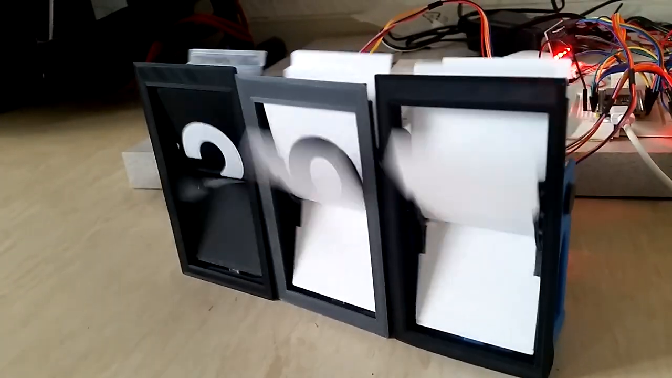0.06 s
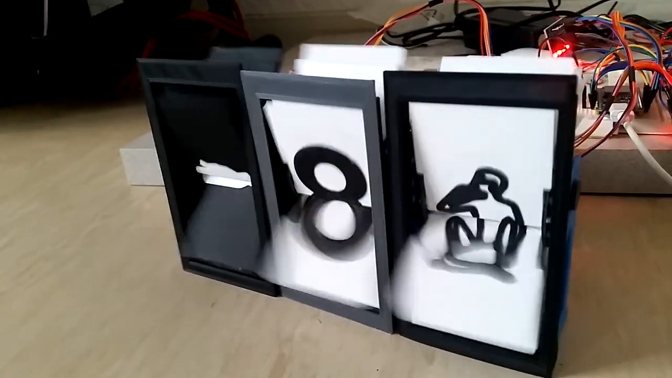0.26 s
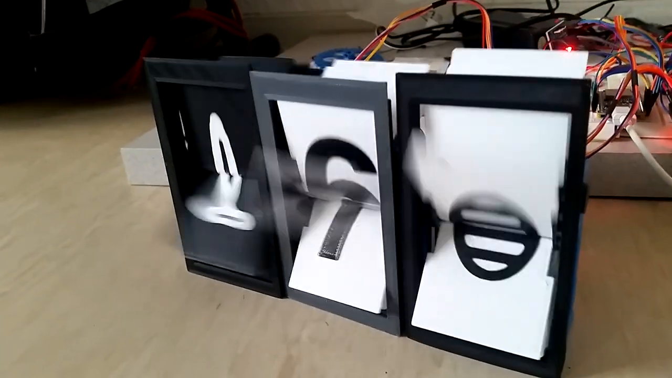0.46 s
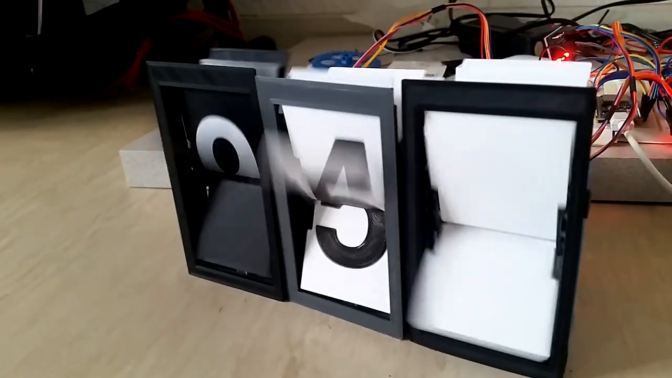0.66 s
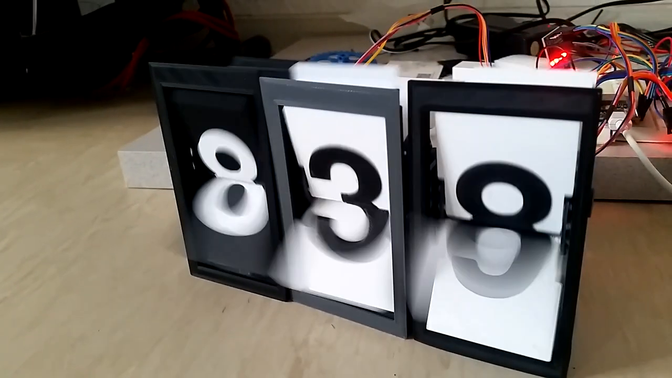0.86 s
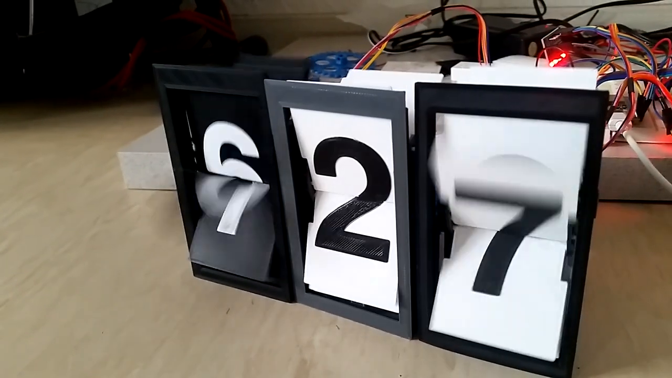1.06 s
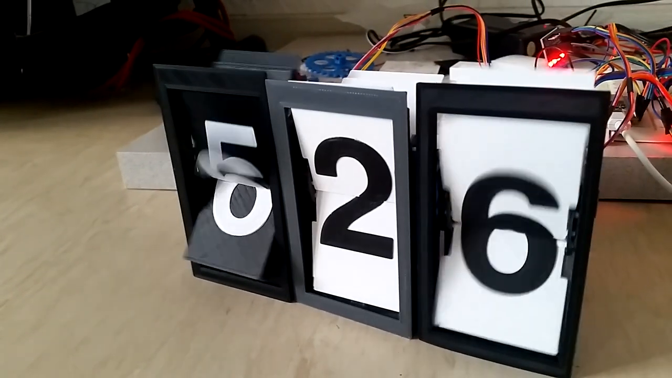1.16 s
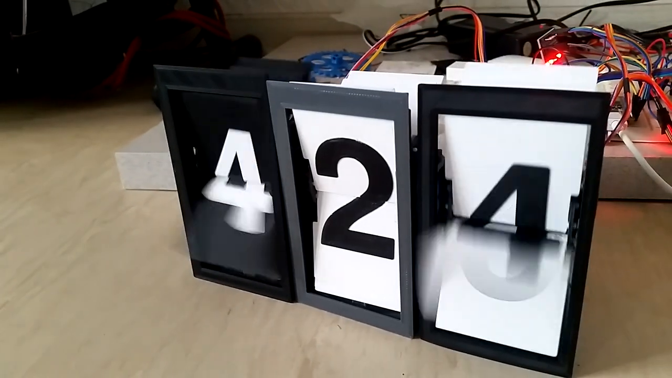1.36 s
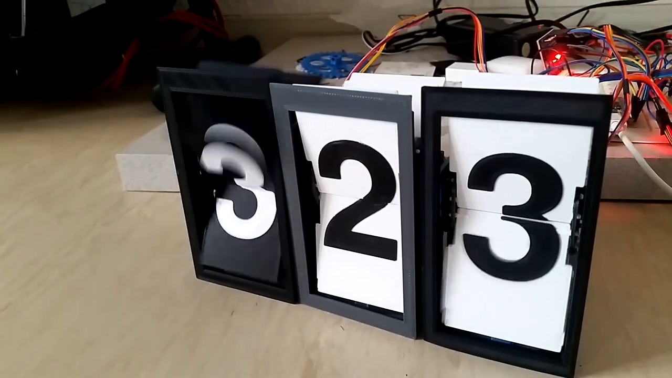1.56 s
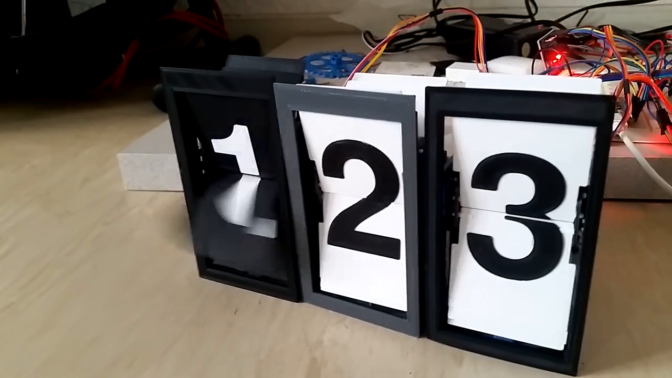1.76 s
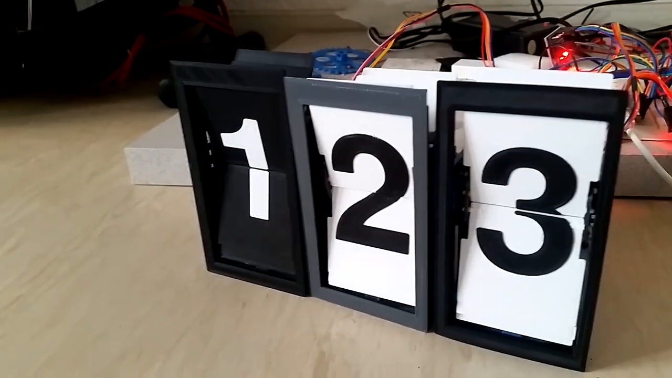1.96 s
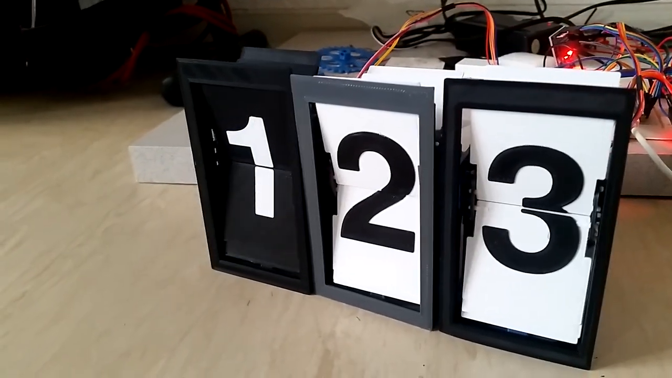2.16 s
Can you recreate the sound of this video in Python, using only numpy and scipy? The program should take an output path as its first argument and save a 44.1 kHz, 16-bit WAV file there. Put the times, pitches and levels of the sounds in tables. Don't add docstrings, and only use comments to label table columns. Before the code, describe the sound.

Plastic display flaps snap over, close and dry. A faint rustle and light tick open, then from 0.2 s dense, bright, irregular slaps from three drums, busiest until 0.9 s. Two drums clatter on to 1.5 s, then one gives sparser snaps near 1.62, 1.75 and 1.88 s. Tiny bounces fade by 2.1 s, leaving faint low hum and small-room air; motor rumble is barely audible.

```python
import sys
import numpy as np
from scipy import signal
from scipy.fft import rfft, irfft, next_fast_len
from scipy.io import wavfile
from scipy.ndimage import uniform_filter1d

SR = 44100
rng = np.random.default_rng(int(sys.argv[2]) if len(sys.argv) > 2 else 0)


def put_to_file(sound):
    columns = np.atleast_2d(sound).T
    safe = np.clip(columns, -1, 1)
    whole_steps = np.round(safe * 32767)
    wavfile.write(sys.argv[1], SR, whole_steps.astype(np.int16))


def natural_amplitude(level_db):
    exponent = np.asarray(level_db, float) / 20
    return 10 ** exponent


N = 97020

# hz, side_minus_mid_db
SIDE_WIDTH = [(60, -22), (400, -21.5), (800, -19), (1300, -13), (2500, -10), (5000, -5.5), (10000, -2.5)]


def rms_one(x):
    return x / np.sqrt(np.mean(x ** 2) + 1e-20)


def at_hz(points, hz):
    table_hz, table_db = np.array(points)[:, 0], np.array(points)[:, 1]
    return np.interp(np.log(hz), np.log(table_hz + 1), table_db)


def resonance(hz, width_hz, size):
    r = np.exp(-np.pi * width_hz / SR)
    z = np.exp(-2j * np.pi * np.arange(size // 2 + 1) / size)
    return (1 - r * r) / 2 * (1 - z * z) / (1 - 2 * r * np.cos(2 * np.pi * hz / SR) * z + r * r * z * z)


def drift(rate_hz):
    r = np.exp(-2 * np.pi * rate_hz / SR)
    noise = rng.standard_normal(N + SR // 2)
    return rms_one(signal.lfilter([1], [1, -2 * r, r * r], noise)[SR // 2:])


def causal(db):
    cepstrum = irfft(db * np.log(10) / 20)
    half = cepstrum.shape[-1] // 2
    return np.exp(rfft(cepstrum * np.r_[1, 2 * np.ones(half - 1), 1, np.zeros(half - 1)]))


def grains(shape, spread_db):
    size_db = spread_db * np.minimum(rng.exponential(1, shape), 3.5)
    return natural_amplitude(size_db) * rng.choice([-1, 1], shape)


def turning_db():
    # start_s, level_db
    stir = [(0, -30.5), (.04, -43), (.09, -40.5), (0.131, -35.5), (.18, -43.5), (.25, -32.5), (.42, -31.5),
            (.7, -34), (1.08, -35), (1.17, -38), (1.4, -35.5), (1.54, -39), (1.66, -35.5), (1.83, -45.5),
            (1.9, -42.5), (1.97, -57), (2.07, -66.5), (2.2, -90.5)]
    return np.interp(np.arange(N) / SR, *np.transpose(stir))


def background():
    # hz, level_db_per_hz
    air_colour = [(12, -33), (20, -3.5), (70, -4), (277, -20), (337, -26), (4940, -37.5), (14700, -36),
                  (16000, -36)]
    hz = np.arange(N // 2 + 1) * SR / N + 1
    mid, side, hum, motor = rfft(rng.standard_normal((4, N)))
    side = side * natural_amplitude(at_hz(SIDE_WIDTH, hz))
    air = rms_one(irfft(np.array([mid + side, mid - side]) * natural_amplitude(at_hz(air_colour, hz)), N))
    hum = rms_one(irfft(hum * resonance(103, 25, N) ** 2, N))
    motor = rms_one(irfft(motor * resonance(150, 270, N), N))
    turning = turning_db()
    motor_db = -56.5 + 0.45 * (turning - turning.mean())
    return natural_amplitude(-63) * air + natural_amplitude(-63) * hum + natural_amplitude(motor_db) * motor


def flap_and_frame(treble_db, full_db, start_s, vary_db, peak_vary_db, size):
    # hz, level_db_per_hz
    slap_colour = [(30, -18), (400, -17), (1200, -12), (2500, -8), (4500, -5.5), (7000, -6), (12000, -5.5),
                   (16000, -8.5)]
    # pitch_hz, width_hz, lift_db
    frame_rings = [(1783, 210, 3.5), (2560, 640, 5.5), (4194, 375, 8.5), (5280, 610, 7), (6540, 92, 1),
                   (8450, 250, 7), (11150, 550, 5), (13000, 370, 3)]
    # start_s, pitch_hz, lift_db
    own_rings = [(.254, 5250, 5.5), (.65, 5300, 5), (.728, 2720, 7.5), (.835, 4900, 5.5), (.967, 1500, 4.5),
                 (1.3, 5100, 9), (1.328, 5200, 8.5), (1.464, 5320, 5), (1.618, 5440, 8),
                 (1.879, 4170, -3.5), (1.986, 4800, 8), (2.112, 4540, 6.5)]
    own_width_hz, own_reach_s, wander = 900, .004, 0.028

    hz = np.arange(size // 2 + 1) * SR / size + 1
    octave = np.log2(hz / 4000)
    db = at_hz(slap_colour, hz) + np.outer(treble_db, octave.clip(-.5, 2))
    db -= np.outer(full_db, (octave + .5).clip(-2, 0))
    centres = np.arange(-3, 2.5, .5)[:, None]
    bumps = np.exp(-(2 * (octave - centres)) ** 2)
    db += vary_db * rng.standard_normal((len(db), len(centres))) @ bumps

    pitch_hz, width_hz, lift_db = np.transpose(frame_rings)[:, :, None]
    luck = rng.standard_normal((len(db), 2, len(pitch_hz), 1))
    pitch_hz = pitch_hz * (1 + wander * luck[:, 0] * (peak_vary_db > 0))
    lift_db = lift_db + peak_vary_db * luck[:, 1]
    db += (lift_db / (1 + (2 * (hz - pitch_hz) / width_hz) ** 2)).sum(1)
    for when_s, own_hz, own_db in own_rings:
        this_flap = np.abs(np.subtract(start_s, when_s)) < own_reach_s
        db += np.outer(this_flap, own_db / (1 + (2 * (hz - own_hz) / own_width_hz) ** 2))
    return causal(db), causal(db + at_hz(SIDE_WIDTH, hz))


def rustle():
    touches_per_s, flutter_s = 250, 0.0014
    rub = 1.15
    size = 2 ** 17
    octave = np.log2(np.arange(size // 2 + 1) * SR / size / 4000 + 1e-3)
    register_octave = np.arange(-1.5, 2, .75)[:, None]
    share = np.exp(-(octave.clip(-1.5, 1.5) - register_octave) ** 2 * 3)
    shape = (len(share), N)
    touches = np.abs(grains(shape, 2.5)) * (rng.random(shape) < touches_per_s / SR)
    touches = touches * natural_amplitude(0.5 * drift(30))
    bursts = rub + signal.lfilter([1], [1, -np.exp(-1 / (flutter_s * SR))], touches)

    def flutter(response):
        registers = rfft(bursts * rng.standard_normal(N), size) * share
        return irfft(registers.sum(0) / share.sum(0) * response[0], size)[:N]

    mid, side = map(flutter, flap_and_frame([-3.5], [2.5], [-1], 0, 0, size))
    return natural_amplitude(turning_db() - 2) * rms_one(np.array([mid + side, mid - side]))


def slaps():
    # start_s, peak_db, treble_db, length_ms, fullness_db
    three_drums = [(.075, -18.5, -23, 2.4, 2), (.2097, -4.5, -18.5, 5.6, 1), (.234, -5.5, -17, 8.4, -1),
                   (.2542, -2, -15, 4.4, 0.5), (.3217, -9.5, -15.5, 1.4, -3.5), (.336, -4, -11, 6.3, 3),
                   (.3631, -1, -12, 5.9, -3), (.3742, 0, -12.5, 5.5, -2.5), (.469, -2.5, -17.5, 5.1, 1),
                   (.4908, -6, -14.5, 7.6, -0.5), (.4978, -3.5, -15, 3.3, -1), (.5548, -8, -11.5, 3, 3.5),
                   (.5695, -1, -10, 8.9, -2), (.6048, -10.5, -7, 6.3, 4), (.6128, -2.5, -12.5, 4.5, 1.5),
                   (.65, -1.5, -16.5, 7.9, -5), (.7275, -4, -12, 6.8, 2), (.7435, -0.5, -13.5, 5, -1),
                   (.769, -5.5, -13, 6.3, 0.5), (.8242, -3.5, -13, 2.7, -1), (.8345, -1, -8.5, 6.8, 1),
                   (.8851, -6, -29.5, 8.2, -7)]
    # start_s, peak_db, treble_db, length_ms, fullness_db
    two_drums = [(0.9618, -6, -25, 3.7, -0.16), (0.9676, -2.5, -10.5, 5.6, -0.81),
                 (0.9979, -3, -13.5, 6.4, 0.13), (1.04, -8, -10.5, 2.5, -2.4),
                 (1.068, -13.5, -14.5, 7.5, 1), (1.0804, -7, -16.5, 4.1, -0.99),
                 (1.0849, -8, -19.5, 4.6, -2.1), (1.1034, -3, -12.5, 7.7, 0.081),
                 (1.1238, -5.5, -15.5, 5.7, -0.37), (1.1986, -4, -12, 7.2, 0.32), (1.2545, -4, -21, 4.9, 1),
                 (1.3002, -19.5, -7.5, 5.8, 1), (1.3283, -4.5, -16, 7.4, 1),
                 (1.3878, -2.5, -15, 5.2, -0.89), (1.4636, -5, -14, 5.7, 1), (1.5008, -8.5, -15, 4.5, 1)]
    # start_s, peak_db, treble_db, length_ms, fullness_db
    last_drum = [(1.5518, -18, -16, 4.3, -2), (1.594, -21.5, -13, 8, 1), (1.6051, -16, -15, 6.3, 0.5),
                 (1.618, -8, -14.5, 5.1, 1), (1.6467, -10.5, -14.5, 4.1, 2), (1.6548, -12.5, -28, 6.3, -1),
                 (1.7465, -4, -16, 7.1, -0.5), (1.8528, -20, -11, 2.2, -1), (1.8788, -7.5, -17, 5.4, 1),
                 (1.9857, -21, -19.5, 1.7, -3.5), (2.021, -22, -12, 1.8, 5), (2.112, -40.5, -22.5, 1.9, -5)]
    # start_s, peak_db, treble_db
    ticks = [(0.1203, -25, -11.5), (.130, -24.5, -11), (0.206, -19, -16), (0.2227, -15.5, -16),
             (0.27, -19, -15.5), (0.3458, -14, -28), (0.4361, -17.5, -16.5), (0.4583, -15.5, -11.5),
             (0.482, -27.5, -12), (0.5187, -18, -6), (.592, -19.5, -11), (0.6197, -5, -1),
             (0.6296, -8, -7.5), (0.6873, -15, -20.5), (0.6982, -14, -22), (0.7028, -14, -17),
             (.7828, -15.5, -12.5), (.858, -10, -10), (0.9126, -15, -10.5), (0.9578, -20, -18),
             (1.030, -19, -12), (1.0534, -16, -10), (1.1555, -32, -11), (1.171, -15.5, -6),
                  (1.2217, -16, -15), (1.2719, -16, -3), (1.3152, -17, -14), (1.4436, -14, -8.5),
                  (1.482, -22, -15), (1.5779, -18, -11), (1.679, -20, -6), (1.708, -21.5, -17),
                  (1.7225, -25, -20.5), (1.7508, -9, -13.5), (1.7626, -20.5, -12), (1.8184, -29.5, -16.5),
                  (1.8819, -16.5, -11), (2.0262, -29, -19), (2.036, -32, -28), (2.049, -39, -22.5)]
    # start_s, peak_db, treble_db, fullness_db
    more_ticks = [(0.0568, -31, -33, 6.5), (0.0624, -38, -21, 10), (0.1632, -32, -13, -5),
                  (0.1944, -33, -7, -1.0), (0.4923, -1, -15, -4.5), (0.5648, -4.5, -6.5, 5.5),
                  (0.6057, -5, -9.5, 3), (0.792, -23, -19, 4), (0.8042, -14, -13, 3), (0.831, -10, -9.0, -12),
                  (0.9078, -21.0, -11, -7), (0.9343, -23.0, -9, -2), (0.9495, -21, -14, 0),
                  (1.0978, -13, -15.5, 4), (1.1676, -19.5, -8, -4), (1.1824, -25, -13.0, -2),
                  (1.189, -29, -12, -6), (1.3, -17, -8.5, 1.5), (1.322, -26, -20.5, 8), (1.3606, -17.5, -23, 2.0),
                  (1.3771, -11.5, -5.5, 3.5), (1.4152, -19, -2, -5.5), (1.4318, -18.5, -4.5, -6),
                  (1.4523, -24.5, -9, -1.0), (1.456, -20.5, -22.5, 6), (1.5668, -24.5, -21, -1.5),
                  (1.5857, -29, -19, -8), (1.634, -13.5, -11, 1.5), (1.6738, -22.0, -4, -8),
                  (1.8218, -29.0, -20, -3.0), (1.8336, -33, -18, -1.5), (1.8582, -35, -13, -1.0),
                  (1.8643, -39.5, -20, -9), (2.091, -41.0, -16, 2.0)]
    tick_ms, tick_fullness_db = 1.9, -5
    span, lead = 8192, 512

    rows = [*three_drums, *two_drums, *last_drum]
    rows += [(*row, tick_ms, tick_fullness_db) for row in ticks]
    rows += [(*row[:-1], tick_ms, row[-1]) for row in more_ticks]
    start_s, peak_db, treble_db, length_ms, full_db = np.transpose(rows)
    tick = (length_ms == tick_ms)[:, None]
    length_s = np.maximum(length_ms, .5)[:, None] / 1000
    since = (np.arange(span) - lead) / SR
    t = np.maximum(since, 0)
    inside = t < span / SR / 2

    blow = np.exp(-(t / length_s) ** 1.83) * (1 + natural_amplitude(3.5) * np.exp(-t / 0.00009))
    since_face = since - 0.0038 * length_s / .005
    face = (since_face > 0) * np.exp(-np.abs(since_face) / 0.00016)
    blow += natural_amplitude(1.5) * face * rng.uniform(0.11, 1, (len(start_s), 1))
    scrape = np.exp(np.minimum(since, 0) / 0.0035 * length_s.mean() / length_s)
    blow = np.where(since < 0, natural_amplitude(-12 - 15.5 * tick) * scrape, blow) * inside
    patter = natural_amplitude(-8.5 - 6.5 * tick) * np.exp(-t / 0.018) * (since > 0) * inside
    patter_dull = 1 / (1 + 1j * np.arange(span // 2 + 1) * SR / span / 8200)
    uneven = rms_one(uniform_filter1d(rng.standard_normal(blow.shape), size=50))
    ragged = natural_amplitude(3.5 * np.tanh(t / .002) * uneven)

    def strike(response):
        hit = rfft(grains(blow.shape, 3) * blow * ragged)
        settling = rfft(grains(blow.shape, 3) * patter * ragged) * patter_dull
        return irfft((hit + settling) * response, span)

    tilt_db = 0.46 * (treble_db + 13)
    mid, side = map(strike, flap_and_frame(tilt_db, full_db, start_s, 1.0, 2.5, span))
    loud = np.sqrt(uniform_filter1d(mid ** 2, size=64).max(1, keepdims=True))
    puff_s = .0011
    puff = np.e * t / puff_s * np.exp(-t / puff_s)
    puff = signal.lfilter(*signal.butter(1, 40.2, "high", fs=SR), puff)
    mid = mid / loud + natural_amplitude(-21.5 + .6 * full_db[:, None]) * puff * ~tick
    side = side / loud

    out = np.zeros((2, lead + N + span))
    for start, gain, m, d in zip((start_s * SR).astype(int), natural_amplitude(peak_db - 8.5), mid, side):
        out[:, start:start + span] += gain * np.array([m + d, m - d])
    return out[:, lead:lead + N]


def room(x):
    t60_s, low_hz, wall_cut_hz = 0.26, 1000, 12000
    size = next_fast_len(N + SR)
    w = 2 * np.pi * np.arange(size // 2 + 1) / size
    x = signal.lfilter(*signal.butter(2, low_hz, "high", fs=SR), x)
    dull = 1 / (1 + 1j * w * SR / (2 * np.pi * wall_cut_hz))
    echoes = []
    for k, lag_s in enumerate(rng.uniform(0.0071, 0.033, 16)):
        loop = natural_amplitude(-60 * lag_s / t60_s) * dull * np.exp(-1j * w * np.round(lag_s * SR))
        echoes.append(loop / (1 - loop) * (-1) ** (k // 2))
    left, right = sum(echoes[::2]), sum(echoes[1::2])
    return irfft(rfft(x, size) * np.array([left, right]), size)[:, :N]


def scene():
    flaps = slaps() + rustle()
    return flaps + natural_amplitude(-26.5) * room(flaps) + background()


def band_limit(x):
    return signal.sosfilt(signal.butter(12, 16970, fs=SR, output="sos"), x)


def record(dry):
    ceiling = .85
    rounded = ceiling * np.tanh(dry / ceiling)
    top_cut = signal.cheby2(10, 40, 16200, fs=SR, output="sos")
    mix = signal.sosfilt(top_cut, rounded)
    return band_limit(mix)


dry = scene()
out = record(dry)
put_to_file(out)
```